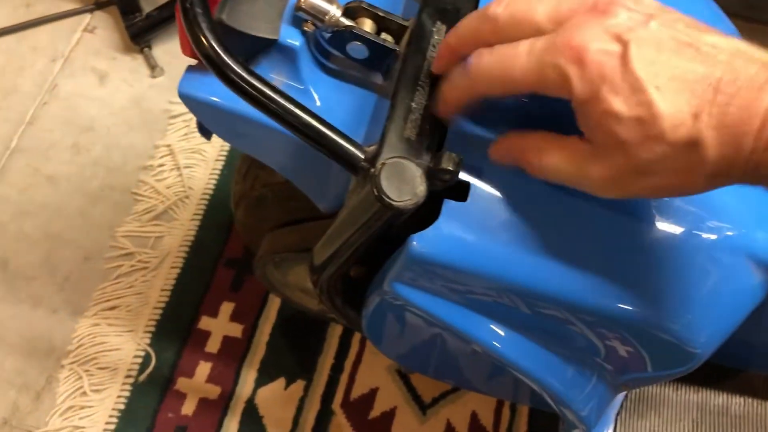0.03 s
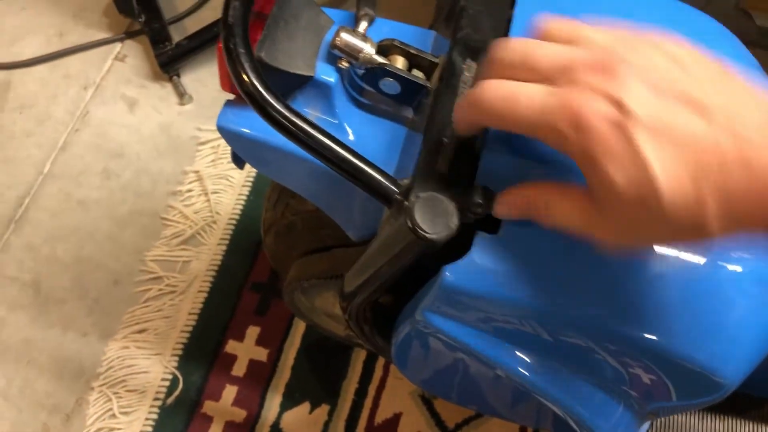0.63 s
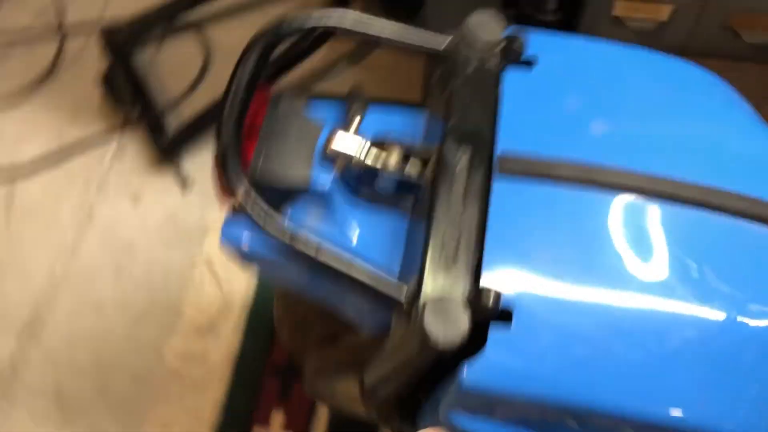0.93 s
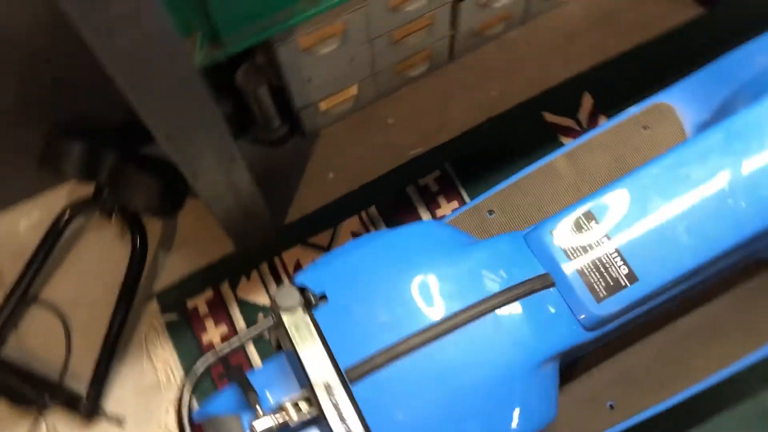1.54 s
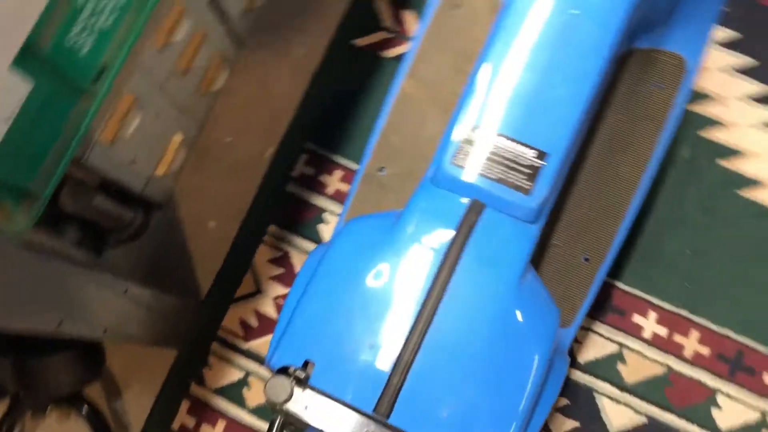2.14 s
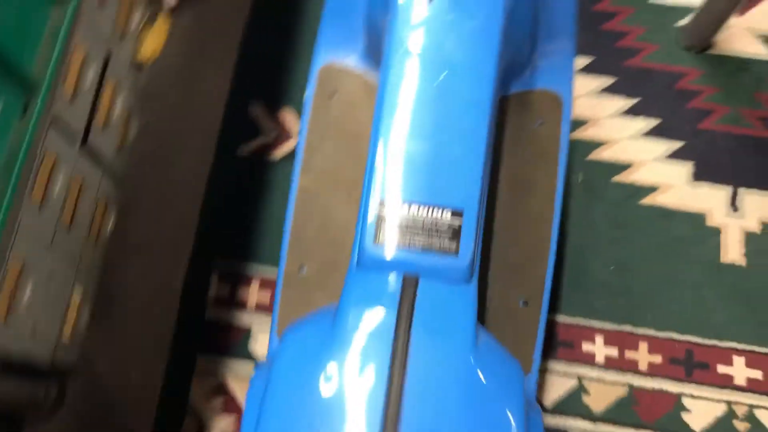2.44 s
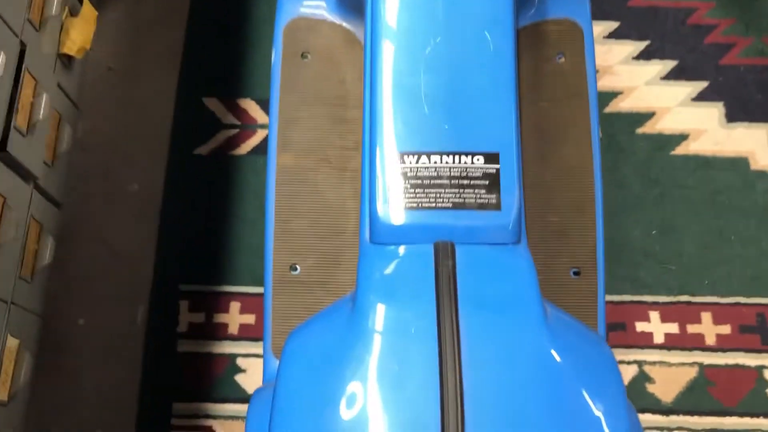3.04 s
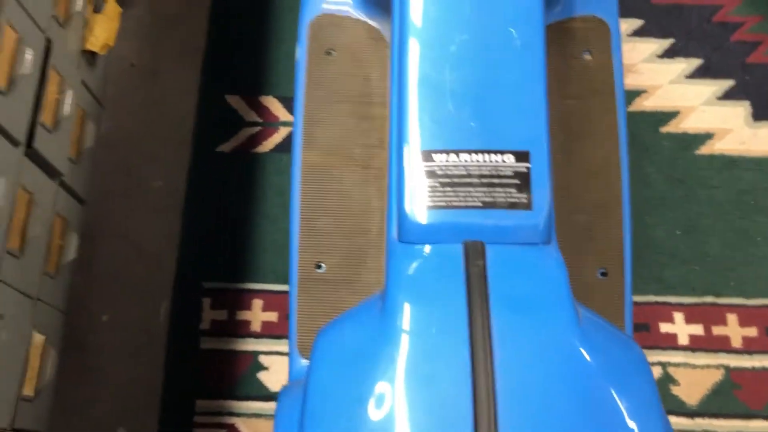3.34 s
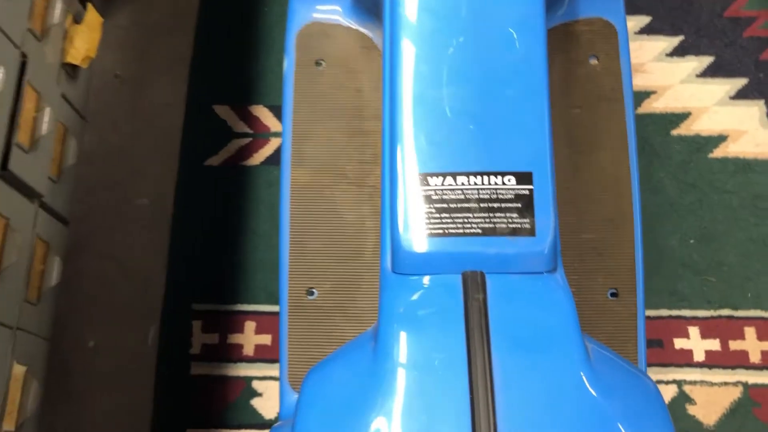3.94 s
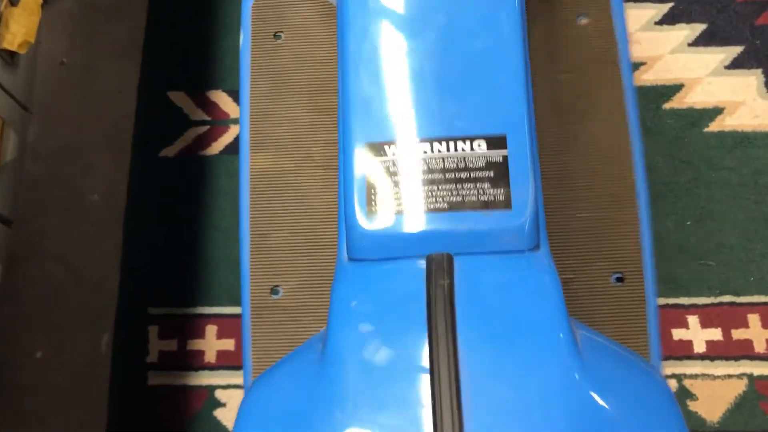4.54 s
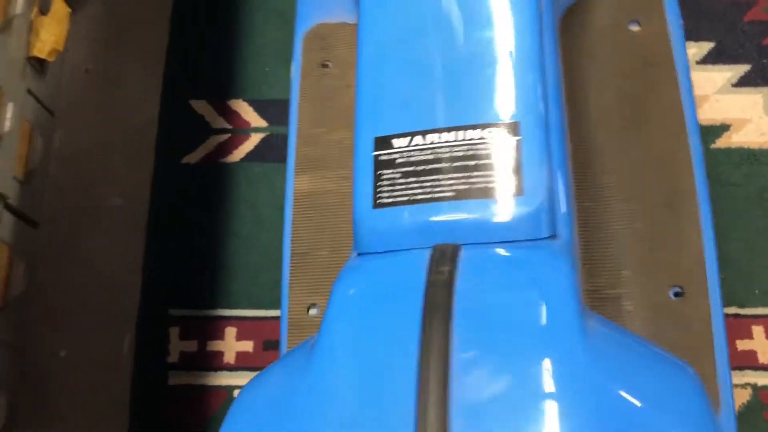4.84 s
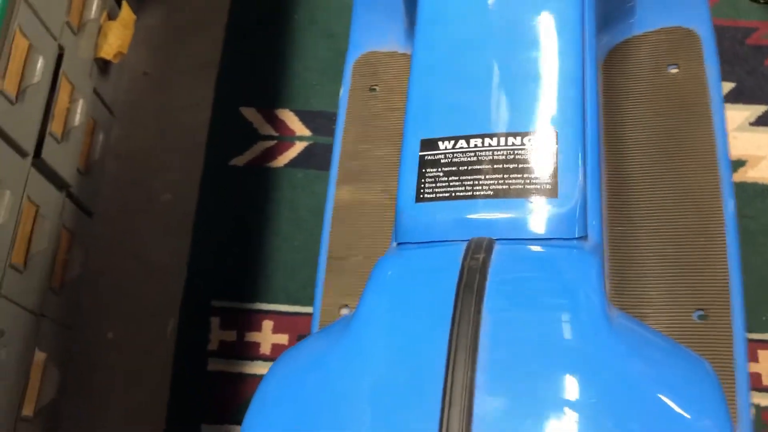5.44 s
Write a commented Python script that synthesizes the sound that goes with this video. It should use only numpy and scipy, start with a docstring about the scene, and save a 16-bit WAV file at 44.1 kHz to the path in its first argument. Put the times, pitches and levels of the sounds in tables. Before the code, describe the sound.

In a quiet workshop with a faint electrical hum, a few close bumps and a short metallic knock come from a scooter being touched. A quieter stretch follows, with light ticks, rustling clothes and soles dragging on a rug. Then come the loudest sounds, as the plastic body rattles on its mounts and the metal frame catches and slips in quick jerks.

```python
"""Soft bumps and a hand's knock on the steel tail rack of a small electric scooter, close to the microphone.
It stands on a rug in a workshop: small fittings tick, clothes rub and feet shuffle.
Then it is shifted: the plastic shell clatters on its mounts and the frame judders in quick slips.
Each blow is a crack and a ring of modes; cloth and soles make grainy friction noise.
Behind it all lie a short room tail, still air and a low mains hum."""
import sys
import numpy as np
from scipy import signal
from scipy.io import wavfile

SR = 44100
rng = np.random.default_rng(int(sys.argv[2]) if len(sys.argv) > 2 else 0)


def waveform_to_disk(signal):
    """Save audio, clipped to [-1, 1], as 16-bit WAV at the path in sys.argv[1]."""
    frames = np.transpose(np.atleast_2d(signal))
    scaled = np.clip(frames, -1, 1) * 32767
    samples = np.round(scaled).astype(np.int16)
    wavfile.write(sys.argv[1], SR, samples)


N = 246519
TIME = np.arange(N) / SR
RING_TIME = TIME[:SR // 3]


# jolts of the shell: t/s, level/dB, firmness/dB (treble over middle), number of rebounds
SHELL_JOLTS = [(4.622, -42, -8.5, 0), (4.6542, -20, -6, 4), (4.765, -26.5, -19, 0),
               (4.801, -19.5, -18.5, 0), (4.832, -34.5, -9, 1), (4.913, -27.5, -23, 2),
               (4.989, -29.5, -22, 0), (5.008, -33, -18, 0)]
# its dense ring: f/Hz, relative level/dB
SHELL_SPECTRUM = [(60, -11.5), (130, -3), (250, 3), (550, 2), (1000, -6.5), (2000, -10), (4000, -15.5),
                  (6500, -20.5), (10000, -27.5), (16000, -29)]
# its modes: f/Hz, level/dB against the ring, t60/s
SHELL_RESONANCES = [(202, -5, 0.23), (260.2, -2.5, 0.25), (343, -21, 0.21), (450, -5, 0.21),
                    (631, 3, 0.067), (705, -12, 0.072), (859, -9.5, 0.15), (1237, -11.5, 0.19),
                    (1741, -7.5, 0.085), (2207, -5.5, 0.054), (2100, -12, 0.062), (2730, -9, 0.06),
                    (3250, -11, 0.049), (3700, -18, 0.064), (4250, -15, 0.075)]
def shell():
    """The loose plastic shell is jolted and rebounds on its mounts at a nearly even pace, ever weaker."""
    gap_s, jitter_s = 0.0178, 0.00099
    drop_db, loss_db, firmness_db = 4.2, 1.43, -15
    rebounds = []
    for s, db, _, count in SHELL_JOLTS:
        for k in range(1, round(count) + 1):
            rebound_s = s + k * gap_s + jitter_s * rng.standard_normal()
            rebounds.append((rebound_s, db - drop_db - k * loss_db, firmness_db))
    hits = contacts(SHELL_JOLTS, bass_db=-5.5, bass_follows=-0.15) + contacts(rebounds, bass_db=4.5)
    return blows(hits, SHELL_SPECTRUM, SHELL_RESONANCES,
                 stretch=1.84, crack_db=10.5, crack_s=0.0013, contact_s=0.00037)


# the frame catches and lets go with a jerk: t/s, level/dB, firmness/dB
FRAME_CATCHES = [(5.226, -29, -30), (5.42, -29, -29), (5.482, -19, -17.5), (5.571, -21, -17)]
# the push that keeps it juddering: t/s, level/dB
FRAME_PUSH = [(5.435, -21.5), (5.453, -22.5), (5.585, -19)]
# its dense ring: f/Hz, relative level/dB
FRAME_SPECTRUM = [(60, -24), (150, 0.5), (320, -3), (550, -1.5), (1000, -7.5), (2000, -19), (4000, -26.5),
                  (7000, -31.5), (16000, -43.5)]
# its modes: f/Hz, level/dB against the ring, t60/s
FRAME_RESONANCES = [(144.6, -7, 0.41), (212, -3.5, 0.26), (420.6, 4.5, 0.23), (521, 17.5, 0.074),
                    (709, 4.5, 0.1), (852.3, 6.5, 0.11), (893, -3, 0.076), (1150, -3.5, 0.13),
                    (1293, -7.5, 0.085), (1586, -9.5, 0.097), (1854, -1.5, 0.063), (3020, -9, 0.037)]
def frame():
    """The frame slips again and again, harder under a harder push, and sticks just before a catch."""
    gap_s, jitter_s, stick_s = 0.0132, 0.0024, 0.013
    slip_db, scatter_db, firmness_db = -5, 2, -19
    push_s, push_db = np.transpose(FRAME_PUSH)
    beats = np.arange(push_s[0], push_s[-1], gap_s)
    late, strong = rng.standard_normal((len(beats), 2)).T
    times = np.minimum(beats + jitter_s * late, push_s[-1])
    levels_db = np.interp(times, push_s, push_db) + slip_db + scatter_db * strong
    slips = [(s, db, firmness_db) for s, db in zip(times, levels_db)
             if not any(0 < catch_s - s < stick_s for catch_s, *_ in FRAME_CATCHES)]
    hits = contacts(FRAME_CATCHES, bass_db=-11.5, bass_follows=-0.28) + contacts(slips, bass_db=-3)
    return blows(hits, FRAME_SPECTRUM, FRAME_RESONANCES,
                 stretch=0.9, crack_db=-21, crack_s=0.0038, contact_s=0.00034)


# knocks on the rack: t/s, relative level/dB, firmness/dB
HAND_KNOCKS = [(0.189, -26.5, -10), (0.374, -54, -10), (0.529, -41, -25), (0.557, -40, -26),
               (0.649, -41.5, -26.5), (0.712, -42.5, -4.5)]
# its dense ring: f/Hz, relative level/dB
RACK_SPECTRUM = [(60, -21.5), (200, -16), (480, -21), (700, 1), (1200, -8), (1800, -8), (4000, -10.5),
                 (6500, -13), (9500, -21.5), (16000, -17)]
# its modes: f/Hz, level/dB against the ring, t60/s
RACK_RESONANCES = [(266, 3, 0.16), (399, -13, 0.17), (637, 7, 0.064), (723, 13.5, 0.035), (843, -12, 0.091),
                   (1113, 2, 0.041), (1318, 11.5, 0.023), (2440, 3, 0.047), (3465, -6, .04),
                   (4380, -26, 0.0397), (7700, -27, .035)]
def rack():
    """A hand knocks the steel rack, the part nearest the microphone, and it rings briefly."""
    hits = contacts(HAND_KNOCKS, bass_db=-1.5, bass_follows=0.6)
    return from_db(0.5) * blows(hits, RACK_SPECTRUM, RACK_RESONANCES,
                                stretch=0.65, crack_db=2, crack_s=0.0016, contact_s=0.00024)


# soft bumps: t/s, f/Hz, level/dB
PANEL_BUMPS = [(0.103, 266, -29.5), (0.272, 266, -26), (1.1, 93.5, -35.5), (2.238, 300, -42.5),
               (2.532, 295, -46.5), (2.918, 304, -48.5), (3.915, 228, -38.5), (4.538, 309, -28.5),
               (4.555, 212, -28), (4.942, 214, -13.5), (5.273, 212, -28.5)]
def bumps(rise_s=0.0016, t60_s=0.105, upper_ratio=1.55, upper_db=-15.5):
    """A soft contact, close by, wakes only a low panel mode and a weaker one above it."""
    track = np.zeros(N)
    for s, hz, db in PANEL_BUMPS:
        phase = 2 * np.pi * hz * RING_TIME
        envelope = (1 - np.exp(-RING_TIME / rise_s)) * from_db(db - 60 * RING_TIME / t60_s)
        add(track, s, envelope * (np.sin(phase) + from_db(upper_db) * np.sin(upper_ratio * phase)))
    return track


# ticks of the fittings: t/s, level/dB, firmness/dB
FITTING_TICKS = [(0.008, -60.5, 8), (0.102, -55.5, -9.5), (0.243, -66.5, 4), (0.848, -53, -7.5),
                 (0.859, -52, -3.5), (0.895, -60.5, 7), (0.938, -54.5, 2), (1.013, -50, -20),
                 (1.092, -56.5, 8), (1.12, -58, 4), (1.186, -51, -9), (1.41, -44, -11),
                 (1.532, -51.5, -12.5), (1.659, -58.5, 3), (2.426, -53.5, -15), (3.09, -65.5, 10),
                 (3.891, -64.5, 3.5), (3.961, -58.5, -4)]
# spells of jiggling: start t/s, end t/s
JIGGLE_SPANS = [(0.856, 0.925), (1.1, 1.21)]
# their dense ring: f/Hz, relative level/dB
FITTING_SPECTRUM = [(60, -37.5), (300, -6.5), (1000, -3.5), (3000, -1), (6000, -9.5), (10000, -16.5),
                    (16000, -24)]
# their modes: f/Hz, level/dB against the ring, t60/s
FITTING_RESONANCES = [(1057, -7, 0.029), (1240, 12, 0.0069), (1900, -11, 0.077), (2600, -7, 0.009)]
def fittings():
    """Small fittings tick close to the microphone; loose ones jiggle faintly as the hand slides off."""
    jiggles_per_s, jiggle_db, scatter_db, firmness_db = 50, -59, 3, -4
    jiggles = [(rng.uniform(start, end), rng.normal(jiggle_db, scatter_db), firmness_db)
               for start, end in JIGGLE_SPANS for _ in range(round((end - start) * jiggles_per_s))]
    hits = contacts(FITTING_TICKS + jiggles, bass_db=-3.5, bass_follows=1.0)
    return blows(hits, FITTING_SPECTRUM, FITTING_RESONANCES,
                 stretch=1.0, crack_db=7, crack_s=0.0025, contact_s=0.00023)


# short squeaks: middle t/s, length/s, level/dB, f/Hz
FRAME_SQUEAKS = [(3.01, 0.24, -69, 1467), (5.246, 0.038, -28.5, 893)]
def squeaks():
    """Stick and slip lock briefly onto one mode of the frame."""
    return sum(strokes([row]) * wavering(row[-1], spread=0.01295, rate_hz=130) for row in FRAME_SQUEAKS)


# shuffles: middle t/s, length/s, relative level/dB
FOOT_SHUFFLES = [(1.205, 0.095, -58.5), (1.285, 0.069, -56), (3.0, 0.47, -66), (3.122, 0.062, -45),
                 (3.198, 0.1, -49), (3.376, 0.1, -43.5), (4.12, 0.22, -59), (4.34, 0.13, -48),
                 (4.404, 0.095, -38), (4.56, 0.2, -48), (4.64, 0.056, -32), (5.2, 0.47, -48),
                 (5.43, 0.11, -38)]
# dull sole and gritty scuff: f/Hz, relative level/dB
SOLE_SPECTRUM = [(70, -50), (170, -7.5), (270, -5.5), (450, -12.5), (630, -14), (1000, -25.5), (1600, -35)]
SCUFF_SPECTRUM = [(600, 6.5), (1200, 3.5), (3500, -4), (6000, -12.5), (16000, -46)]
# hollow tones under the soles: f/Hz, width/Hz, lift/dB
HOLLOW_TONES = [(275.5, 13.5, 9), (312.6, 11, 7.5), (607, 45, 8.5), (910, 16, 12.5)]
def feet(sole_db=-5, scuff_db=-17, scuff_follows=0.73):
    """Down on the rug, soles drag dully and hollowly with a gritty scuff on top."""
    drag = strokes(FOOT_SHUFFLES)
    sole = drag * friction(SOLE_SPECTRUM, grain_db=5, grain_hz=121.3)
    hollow = sum((from_db(lift_db) - 1) * resonance(sole, hz, width_hz)
                 for hz, width_hz, lift_db in HOLLOW_TONES)
    # a heavier step is duller: the scuff takes only a share of the sole's swing in dB
    scuff = drag ** scuff_follows * friction(SCUFF_SPECTRUM, grain_db=3.5, grain_hz=300)
    return from_db(sole_db) * (sole + hollow) + from_db(scuff_db) * scuff


# strokes of cloth: middle t/s, length/s, level/dB
SLEEVE_RUBS = [(0.12, 0.082, -59.5), (0.706, 0.02, -51.5), (0.9, 0.2, -58), (1.14, 0.14, -54),
               (1.277, 0.069, -69), (1.51, 0.093, -56), (1.76, 0.91, -68), (2.03, 0.2, -55.5),
               (2.73, 0.39, -51), (2.885, 0.15, -51), (3.365, 0.1, -58), (4.085, 0.07, -57),
               (4.2, 0.42, -64.5)]
SLEEVE_BRUSHES = [(3.548, 0.06, -60), (3.712, 0.095, -59.5), (3.82, 0.036, -69)]
# their hiss: f/Hz, relative level/dB
RUB_SPECTRUM = [(200, -10), (700, -4.5), (1200, 3), (3800, 4), (7000, -2), (11000, -8), (16000, -11.5)]
BRUSH_SPECTRUM = [(1000, 5), (3500, -1.5), (7000, 6), (10000, 3.5), (16000, -2)]
def clothes():
    """A little off the microphone, sleeves rub in grainy strokes and brush in thinner, smoother ones."""
    rub = strokes(SLEEVE_RUBS) * friction(RUB_SPECTRUM, grain_db=2.5, grain_hz=395)
    brush = strokes(SLEEVE_BRUSHES) * friction(BRUSH_SPECTRUM, grain_db=2, grain_hz=500)
    return rub + brush


# decay of the room: f/Hz, t60/s
WORKSHOP_T60 = [(100, 0.33), (500, 0.29), (3000, 0.29), (8000, 0.3), (16000, 0.37)]
def workshop(x, build_s=0.0032):
    """Diffuse reflections build up quickly around the microphone and die in about a third of a second."""
    envelopes = dying(WORKSHOP_T60) * (1 - np.exp(-RING_TIME / build_s))
    tail = bands([(100, -0.5), (16000, -3)], envelopes).sum(0)
    return signal.fftconvolve(x, tail / np.sqrt(np.sum(tail ** 2)))[:N]


# room air: f/Hz, relative level/dB
AIR_SPECTRUM = [(25, -9), (80, -7.5), (135, -5.5), (280, -16), (450, -19), (750, -27), (1200, -31),
                (2500, -37), (5500, -36.5), (10000, -42.5), (16000, -42.5)]
# mains hum: f/Hz, level/dB
MAINS_HUM = [(58, -62.5), (121.5, -67)]
# swell of the hum: middle t/s, length/s, level/dB, f/Hz
DECK_HUM = (2.5, 2.5, -61, 124)
def room_tone(air_db=-60):
    """Still workshop air and a low hum that swells as the microphone moves over the deck."""
    air = bands(AIR_SPECTRUM, np.ones((len(BANK), N))).sum(0)
    hum = sum(from_db(db) * wavering(hz, spread=0.0244, rate_hz=7.1) for hz, db in MAINS_HUM)
    swell = strokes([DECK_HUM]) * wavering(DECK_HUM[-1], spread=0.04, rate_hz=14)
    return from_db(air_db) * air / rms(air) + hum + swell


def contacts(rows, bass_db, bass_follows=0):
    """Firmness lifts the treble and can shift the bass; gives t/s and bass, middle, treble level/dB."""
    return [(s, db + bass_db + bass_follows * firmness_db, db, db + firmness_db)
            for s, db, firmness_db, *_ in rows]


# decay of a panel, before each part's stretch: f/Hz, t60/s
PANEL_DECAY = [(100, 0.083), (600, 0.069), (2000, 0.071), (6000, 0.056), (16000, 0.026)]
def blows(hits, spectrum, modes, stretch, crack_db, crack_s, contact_s):
    """Each blow is a brief crack, then a dense ring out of which the strong modes stand."""
    register_hz = [330, 1255, 5300]   # bass, middle, treble
    registers = np.digitize(CENTRES, [500, 3000])
    onset = SR // 32   # samples over which a blow's level is set
    scatter_db = 2
    track = np.zeros(N)
    decays = dying(PANEL_DECAY, stretch) + from_db(crack_db) * np.exp(-RING_TIME / crack_s)
    for s, *register_db in hits:
        # a dull blow is a soft contact and takes longer to build up
        dullness_db = np.clip(register_db[1] - register_db[2], 0, 20)
        attack = 1 - np.exp(-RING_TIME / (contact_s * from_db(dullness_db)))
        ring = bands(spectrum, decays * attack)
        ring /= rms(ring[:, :onset].sum(0))
        for hz, level_db, t60 in modes:
            strength = from_db(rng.normal(level_db, scatter_db) - 60 * RING_TIME / t60)
            tone = np.sin(2 * np.pi * (hz * RING_TIME + rng.random()))
            ring[np.digitize(hz, EDGES) - 1] += attack * strength * tone
        # place and hardness of the contact set how much bass, middle and treble it wakes
        colour = [(hz, db - 20 * np.log10(rms(ring[registers == k, :onset].sum(0))))
                  for k, (hz, db) in enumerate(zip(register_hz, register_db))]
        add(track, s, from_db(at_hz(colour, CENTRES)) @ ring)
    return track


def friction(spectrum, grain_db, grain_hz):
    """Fibres catch and let go, so the hiss comes in small grains; rms one."""
    grains = from_db(grain_db * wander(grain_hz))
    hiss = bands(spectrum, np.tile(grains, (len(BANK), 1))).sum(0)
    return hiss / rms(hiss)


def strokes(rows, ramp_share=0.43):
    """Gain over time: every stroke swells, holds and fades; their powers add."""
    power = np.zeros(N)
    for s, length_s, db, *_ in rows:
        progress = (TIME - s) / length_s + .5
        pressure = np.clip(np.minimum(progress, 1 - progress) / ramp_share, 0, 1)
        power += (from_db(db) * np.sin(np.pi / 2 * pressure) ** 2) ** 2
    return np.sqrt(power)


def wavering(hz, spread, rate_hz):
    """A sine of rms one whose pitch wanders by a share of itself."""
    pitch_hz = hz * (1 + spread * wander(rate_hz))
    return np.sqrt(2) * np.sin(2 * np.pi * np.cumsum(pitch_hz) / SR)


def wander(rate_hz):
    """Random values joined by straight lines."""
    return np.interp(TIME * rate_hz, np.arange(N), rng.standard_normal(N))


EDGES = np.geomspace(22, 18000, 24)   # f/Hz
CENTRES = np.sqrt(EDGES[1:] * EDGES[:-1])
BANK = [signal.butter(2, pair, "band", fs=SR, output="sos") for pair in zip(EDGES, EDGES[1:])]
def bands(spectrum, envelopes):
    """One row of noise per band, each under its own envelope."""
    drives = rng.standard_normal(np.shape(envelopes)) * envelopes
    gains = from_db(at_hz(spectrum, CENTRES))
    return np.array([gain * signal.sosfilt(sos, drive + 1e-18)
                     for sos, gain, drive in zip(BANK, gains, drives)])


def dying(t60s, stretch=1):
    """One exponential decay per band."""
    return from_db(-60 * RING_TIME / (stretch * at_hz(t60s, CENTRES)[:, None]))


def resonance(x, hz, width_hz):
    """Two-pole resonance with gain one at its peak."""
    r = np.exp(-np.pi * width_hz / SR)
    feedback = [1, -2 * r * np.cos(2 * np.pi * hz / SR), r * r]
    return signal.lfilter(np.array([1, 0, -1]) * (1 - r * r) / 2, feedback, x)


def at_hz(points, hz):
    """Read a table on a log-frequency axis."""
    freqs, values = np.transpose(points)
    return np.interp(np.log(hz), np.log(freqs), values)


def add(track, s, sound):
    """Mix a sound into the track at a time."""
    start = max(round(s * SR), 0)
    track[start:start + len(sound)] += sound[:N - start]


def from_db(db):
    """Decibels to gain."""
    return 10 ** (np.asarray(db) / 20)


def rms(x):
    """Root mean square."""
    return np.sqrt(np.mean(x ** 2) + 1e-20)


def scene():
    """One microphone by the scooter's tail: close and farther sounds, with the workshop around them."""
    close = rack() + fittings() + bumps()
    farther = shell() + frame() + squeaks() + clothes() + feet()
    reflections = workshop(from_db(-9) * close + from_db(-12) * farther)
    return (close + farther + reflections + room_tone())[None]


def record(dry):
    """The microphone loses the bass below 45 Hz, and the top is cut at 16.2 kHz."""
    thin = signal.sosfilt(signal.butter(4, 45, "high", fs=SR, output="sos"), dry)
    return signal.sosfilt(signal.ellip(10, .1, 80, 16200, fs=SR, output="sos"), thin)


dry = scene()
out = record(dry)
waveform_to_disk(out)
```